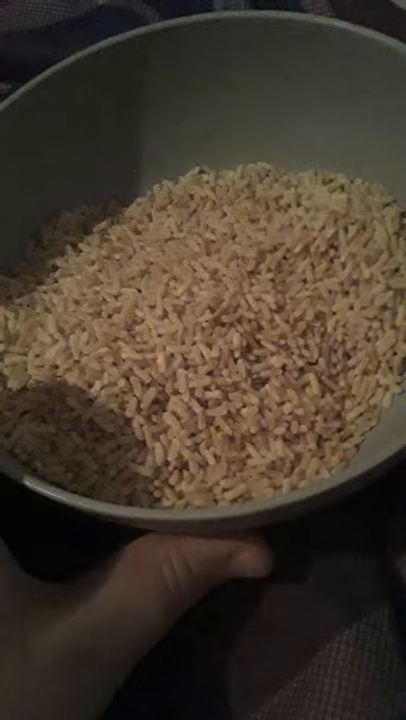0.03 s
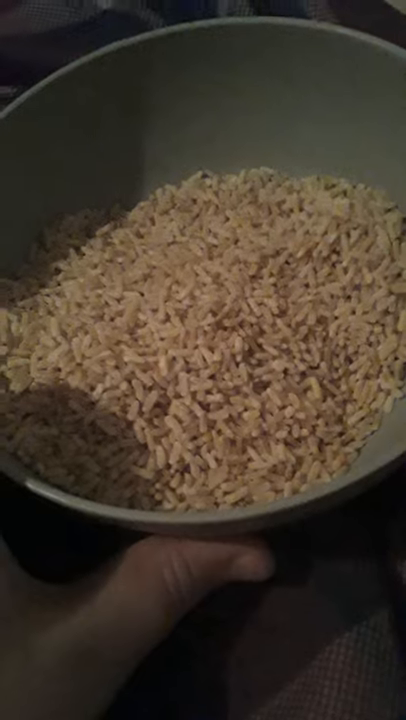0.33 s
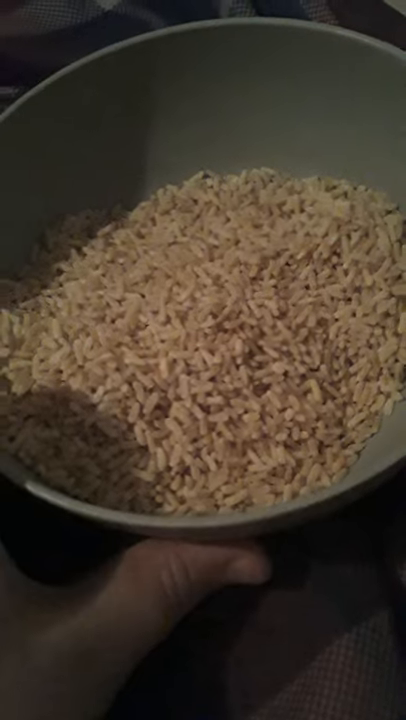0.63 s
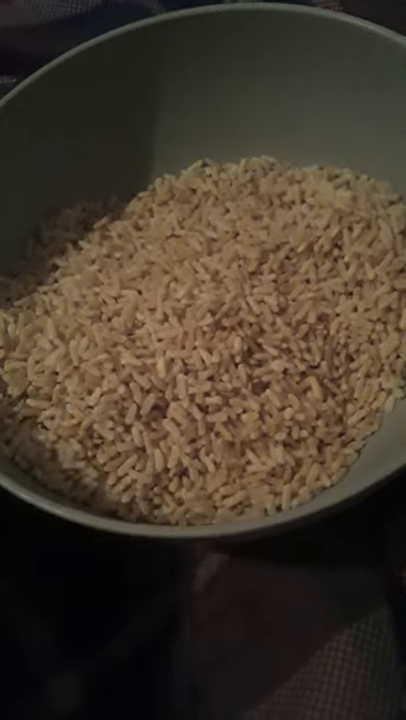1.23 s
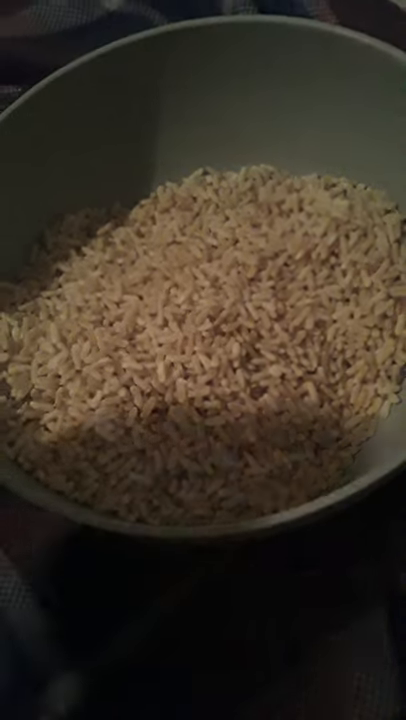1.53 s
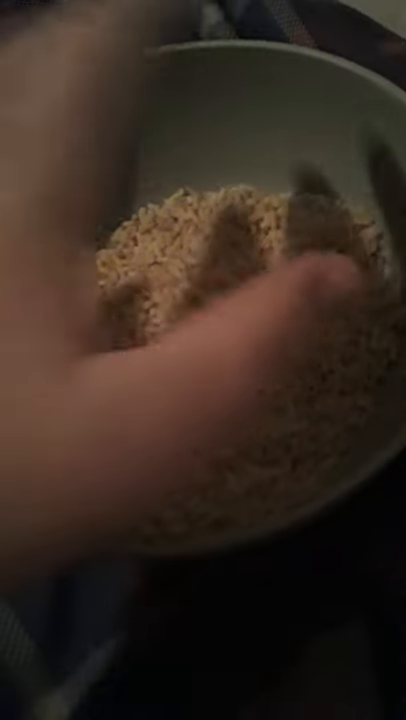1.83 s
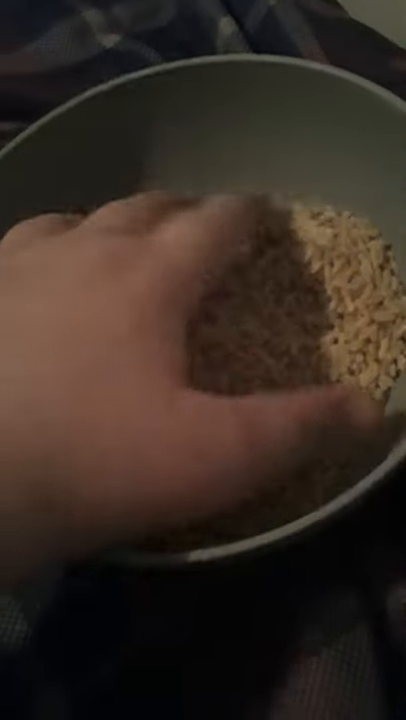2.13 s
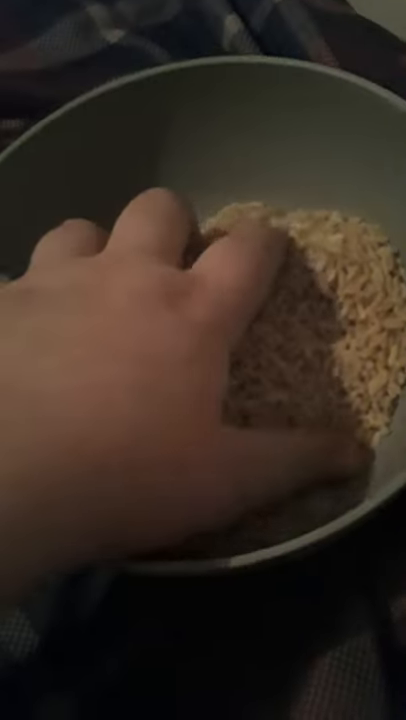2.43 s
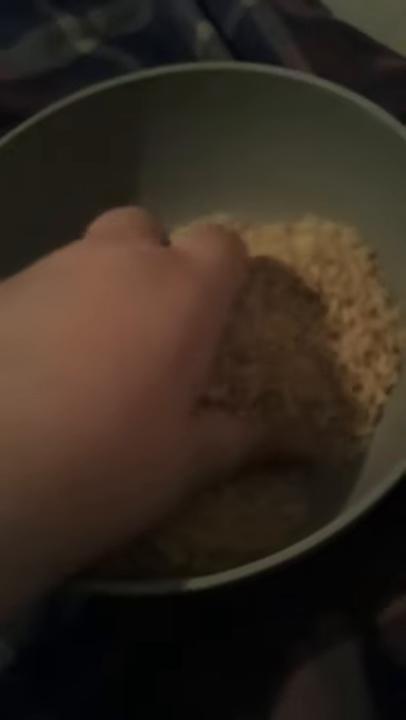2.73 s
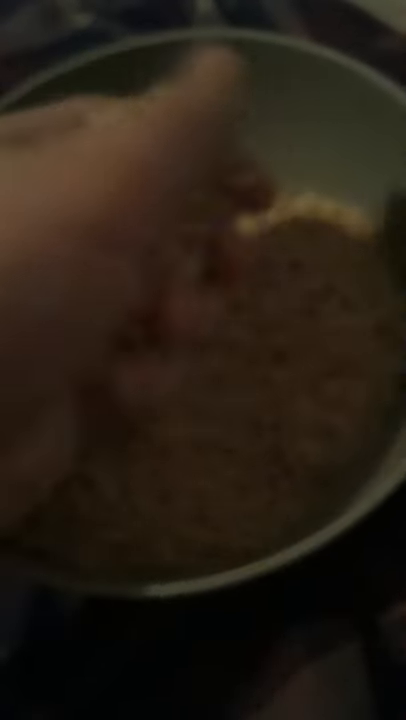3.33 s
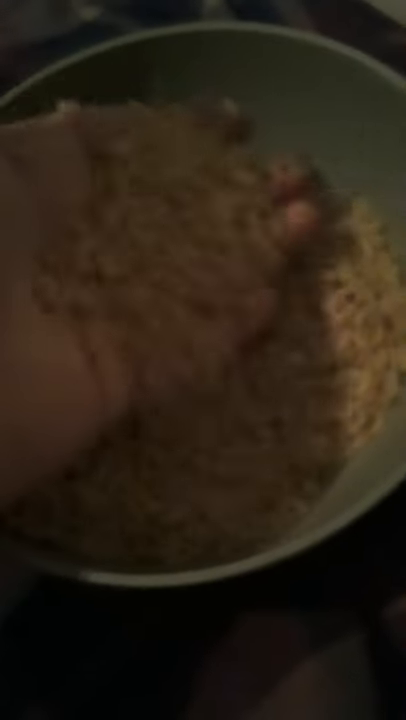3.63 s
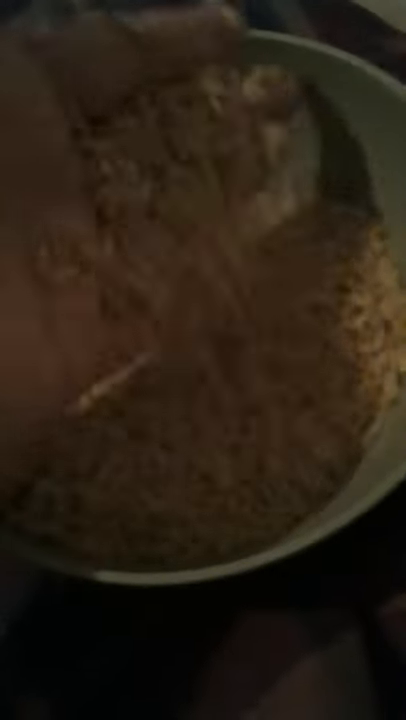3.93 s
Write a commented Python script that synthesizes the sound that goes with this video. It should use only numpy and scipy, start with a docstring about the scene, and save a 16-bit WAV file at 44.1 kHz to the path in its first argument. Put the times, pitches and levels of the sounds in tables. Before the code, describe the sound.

Close to the microphone in a quiet room, dry rice shifts faintly in a bowl. A hand then digs in with a crisp, crackling rustle and lifts, letting a thin stream of grains patter back down.

```python
"""Dry rice in a bowl: a hand plunges in, closes on a fistful, lifts it and lets grains trickle back.
Countless tiny contacts crackle at the surface and, deeper down, ring the bowl; falling grains tick
on the heap. Before the plunge, fingers scuff the bowl, the heap creeps and the bowl settles.
A phone close above hears most of it left port first, in a quiet room with rumble, hiss and faint hum."""
import sys
import numpy as np
from scipy import signal
from scipy.fft import rfft, irfft, next_fast_len
from scipy.io import wavfile

SR = 44100
rng = np.random.default_rng(int(sys.argv[2]) if len(sys.argv) > 2 else 0)


def generate_wav(sig):
    """Save sig (samples, or channels by samples) to the path in sys.argv[1] as 16-bit PCM at SR."""
    pcm = np.round(np.clip(np.atleast_2d(sig).T, -1, 1) * 32767).astype(np.int16)
    wavfile.write(sys.argv[1], SR, pcm)


N = 176400

# fingers scuffing the bowl (time [s], level [dB])
FINGER_SCUFFS = [(0.263, -60), (0.68, -57), (3.603, -54)]
# grains sliding with a faint whistle (start [s], length [s], level [dB], pitch [Hz])
HEAP_SLIDES = [(0.654, 0.34, -73, 3600), (.7, 0.33, -80.5, 4500), (1.148, 0.18, -77, 4200),
               (1.5, .4, -76, 4240), (1.68, 0.39, -70, 3640)]
# single grains landing or slipping (time [s], level [dB], brightness [dB], pitch [Hz])
GRAIN_TICKS = [(0.8224, -45, -15, 3580), (2.1411, -29, -19, 3640), (2.1439, -25, -19, 3600),
               (2.2438, -39, -14, 3700), (2.843, -38, 7, 4000), (2.868, -32.5, 5, 4000),
               (2.902, -36.5, 8.5, 4000), (3.4500, -39.5, 0, 3540), (3.4775, -46, -5.5, 4400),
               (3.5170, -54, -2, 4900), (3.5513, -32.5, -8, 3530), (3.6036, -42, 0, 3340),
               (3.6498, -27, -11, 3930), (3.6529, -21.5, 0.5, 3870), (3.6546, -25, -4, 3530),
               (3.6569, -21.5, 2, 3600), (3.666, -35, -2, 4200), (3.6815, -35, 5, 3640),
               (3.6834, -32, 3, 3500), (3.6907, -39, 0, 4300), (3.7034, -24, 1, 4060),
               (3.7045, -21.5, 0.5, 3900), (3.7097, -20, 0, 4000), (3.7277, -35, -6, 3700),
               (3.7322, -36, -4, 3200), (3.7472, -35, 5, 4220), (3.7951, -35.5, -2, 3550),
               (3.8185, -34.5, -4, 3750), (3.8308, -40, 2, 3600), (3.8339, -30.5, 7, 3420),
               (3.8581, -20, 0, 3670), (3.8944, -35, -4, 3620), (3.9140, -43, 0, 3620),
               (3.9566, -33.5, 8, 3830), (3.9651, -36, 0, 3500), (3.9900, -34.5, -2, 3880),
               (3.9914, -33, 7, 4330)]
# hand digging (time [s], crisp rustle [dB], deep crunch [dB], top fizz [dB])
DIG_LEVELS = [(1.99, -84, -82, -84), (2.025, -76, -72, -88), (2.05, -63, -70, -75), (2.112, -60, -64, -67),
              (2.14, -50, -69, -61), (2.157, -38, -64, -57), (2.172, -35, -55.5, -48),
              (2.188, -49, -61, -67), (2.21, -61, -75, -80), (2.238, -64, -69, -80), (2.262, -45, -58, -65),
              (2.29, -39.5, -50, -54), (2.33, -42.5, -50, -59), (2.376, -46.5, -53, -62),
              (2.416, -39, -45, -56.5), (2.474, -51, -52, -64), (2.524, -42, -43, -60.5),
              (2.555, -47, -44, -59), (2.59, -49, -49, -66), (2.72, -47.5, -46, -57.5),
              (2.81, -47, -46, -61.5), (2.85, -50, -45.5, -58), (2.955, -48, -48.5, -59),
              (3.02, -55.5, -54, -63), (3.27, -64.5, -59.5, -69), (3.37, -67.5, -65.5, -72.5),
              (3.44, -74, -68.5, -73)]
# grains leaving the lifted hand (time [s], level [dB])
TRICKLE_LEVELS = [(3.38, -73), (3.47, -59), (3.58, -58.5), (3.67, -53.5), (3.76, -54.5), (3.9, -56.5),
                  (4.0, -53.5)]
# room noise spectra (frequency [Hz], level [dB])
RUMBLE_SPECTRUM = [(20, -43), (28, -53), (40, -31), (55, -7), (68, -12.5), (95, -7), (130, 1.5), (170, -4),
                   (220, -4.5), (300, -12.5), (400, -21.5), (600, -27), (1200, -32), (4000, -74)]
HISS_SPECTRUM = [(100, -11), (300, 1), (600, 0.5), (850, 2), (1200, 0), (1800, -3), (2500, -9.5),
                 (4200, -11), (6000, -16), (8000, -21), (10000, -17.5), (13000, -12.5), (16000, -16)]
# grain contact spectra (frequency [Hz], level [dB])
CRISP_SPECTRUM = [(300, -27), (1000, -27.5), (2000, -17.5), (2600, -6.5), (3000, -0.5), (3600, -3),
                  (4500, -3.5), (5600, -9.5), (6500, -14.5), (7800, -31.5), (10000, -27), (16000, -43)]
CRUNCH_SPECTRUM = [(150, -22), (350, -12.5), (520, -12.5), (680, -5.5), (850, 1), (1050, -1), (1400, -6),
                   (1650, -5), (2050, -1.5), (2500, -5), (3200, -25.5), (5000, -17.5), (8000, -36)]
FIZZ_SPECTRUM = [(2000, -56), (6000, -11.5), (8000, -11.5), (9500, 0.5), (12000, 1), (16000, 0)]
TICK_SPECTRUM = [(200, -25), (600, -23), (1000, -5.5), (1500, -20.5), (2400, -4.5), (3100, -2.5),
                 (4500, -1), (5400, -5.5), (6400, -0.5), (7900, -29.5), (10000, -35), (16000, -30)]
# resonances of the filled bowl (frequency [Hz], width [Hz], level re direct sound [dB])
BOWL_MODES = [(823, 57, -8), (906, 27, -10), (1120, 13, -36), (1298, 19, -20), (1580, 51, -7),
              (1860, 15, -14), (1914, 20, -17), (3000, 24, -31), (3360, 18, -22), (3500, 100, -2)]


def undb(db):
    """Decibels to gain."""
    return 10 ** (np.asarray(db) / 20)


def times():
    """Sample times [s]."""
    return np.arange(N) / SR


def envelope(rows, column=1):
    """Gain along one dB column of a table; silent outside it."""
    rows = np.array(rows)
    return undb(np.interp(times(), rows[:, 0], rows[:, column], left=-140, right=-140))


def colour(x, spectrum, modes=()):
    """Causal unit-energy filter from a spectrum and optional resonances."""
    size = next_fast_len(x.shape[-1] + 8192)
    f = np.arange(2049) * SR / 4096 + 1e-3
    hz, db = np.array(spectrum).T
    cepstrum = irfft(np.log(undb(np.interp(np.log(f), np.log(hz), db))))
    cepstrum[1:len(f) - 1] *= 2  # fold to minimum phase
    cepstrum[len(f):] = 0
    ring = 1 + sum(undb(mode_db) / (1 + 1j * (f * f - mode_hz ** 2) / (f * width_hz))
                   for mode_hz, width_hz, mode_db in modes)
    response = irfft(np.exp(rfft(cepstrum)) * ring)
    response /= np.linalg.norm(response)
    return irfft(rfft(x, size) * rfft(response, size), size)[..., :x.shape[-1]]


def drift(rate_hz):
    """Smooth random drift, spread near 1."""
    steps = np.random.default_rng(rng.integers(1 << 30)).standard_normal(4096)
    return 1.2 * np.interp(times() * rate_hz, np.arange(len(steps)), steps)


def contacts(per_s, spread_db, surge_db, surge_hz):
    """Random grain contacts of uneven size, bunched into slips; rms 1."""
    hits = (rng.random(N) < per_s / SR) * rng.choice([-1, 1], N)
    hits = hits * undb(spread_db * np.minimum(rng.exponential(size=N), 5))
    hits *= undb(surge_db * drift(surge_hz))
    return hits / np.std(hits)


def pan(left_db):
    """Stereo gains, left over right by left_db."""
    return undb(np.array([[left_db], [-left_db]]) / 2)


def ports(x, left_db, tail_db, t60_s, lag_s=0.00025):
    """Each impulse reaches the left port, then the right; the bowl wall adds a short tail."""
    n = len(x)
    lags_s = np.abs(lag_s + 0.000025 * rng.standard_normal(n))
    arrival = np.arange(n) + np.rint(lags_s * SR).astype(int)
    direct = np.array([x, np.bincount(arrival, x, n)[:n]])
    pole = np.exp(-2 * np.log(1000) / (t60_s * SR))
    tail_power = signal.lfilter([0, 1 - pole], [1, -pole], direct ** 2 + 1e-24)
    tail = np.sqrt(tail_power) * rng.standard_normal((2, n))
    return (direct + undb(tail_db) * tail) * pan(left_db) / np.hypot(1, undb(tail_db))


def room(hum_hz=117.9, swell_s=0.75):
    """Near-mono rumble; hiss and a wavering hum swell in at the start."""
    rumble = colour(rng.standard_normal(N), RUMBLE_SPECTRUM)
    rumble = rumble + undb(-15.5) * colour(rng.standard_normal((2, N)), RUMBLE_SPECTRUM)
    hiss = colour(rng.standard_normal((2, N)), HISS_SPECTRUM) * undb(0.6 * drift(6.77))
    hum = np.sqrt(2) * np.sin(2 * np.pi * hum_hz * times() + 0.54 * drift(5)) * undb(0.82 * drift(4))
    swell = undb(-6 * np.maximum(0, 1 - times() / swell_s))
    return undb(-56.5) * rumble + swell * (undb(-62.5) * hiss + undb(-65) * hum)


def scuffs(decay_s=0.014):
    """Short, dull rubs of skin on the bowl."""
    t = times()
    push = sum(undb(db) * (t > at_s) * np.exp(-np.abs(t - at_s) / decay_s) for at_s, db in FINGER_SCUFFS)
    rub = ports(rng.standard_normal(N) * push, left_db=-4, tail_db=12, t60_s=0.011)
    return colour(rub, CRUNCH_SPECTRUM, BOWL_MODES) + undb(-9) * colour(rub, CRISP_SPECTRUM)


def slides(width_hz=350, ring_db=7):
    """The heap creeps as the bowl tips; each slide has its own pitch."""
    out = np.zeros((2, N))
    creep = contacts(per_s=3300, spread_db=2, surge_db=2, surge_hz=44)
    creep = ports(creep, left_db=-7.5, tail_db=6, t60_s=0.014)
    for start_s, length_s, db, hz in HEAP_SLIDES:
        span = slice(int(start_s * SR), int((start_s + length_s) * SR))
        slide = creep[:, span] * undb(db) * signal.windows.tukey(span.stop - span.start)
        whistle = colour(slide, CRISP_SPECTRUM, [(hz, width_hz, ring_db)])
        out[:, span] += whistle + undb(-5.5) * colour(slide, FIZZ_SPECTRUM)
    return out


def ticks(gain_db=10, width_hz=900, ring_db=3):
    """One impulse per grain, ringing about 1 ms at its own pitch; its fizz leans left."""
    size = 2048
    out = np.zeros((2, N + size))
    for at_s, db, bright_db, hz in GRAIN_TICKS:
        impulse = signal.unit_impulse(size) * undb(db + gain_db)
        hit = ports(impulse, left_db=-0.7, tail_db=-5.5, t60_s=0.011)
        ring = colour(hit, TICK_SPECTRUM, [(hz, width_hz, ring_db)])
        fizz = pan(1.5) * undb(bright_db - 4.5) * colour(hit, FIZZ_SPECTRUM)
        start = int(at_s * SR)
        out[:, start:start + size] += ring + fizz
    return out[:, :N]


def thud(at_s=1.095, hz=50.3, half_width_s=0.039):
    """A few low cycles: the bowl settles as the supporting hand lets go."""
    t = times() - at_s
    return undb(-58) * np.sin(2 * np.pi * hz * t) * np.exp(-(t / half_width_s) ** 2)


def digging():
    """Surface grains rustle and fizz; squeezed grains below crunch against the bowl."""
    crisp = contacts(per_s=13000, spread_db=2, surge_db=0.8, surge_hz=220) * envelope(DIG_LEVELS, 1)
    crunch = contacts(per_s=9000, spread_db=2, surge_db=1.5, surge_hz=150) * envelope(DIG_LEVELS, 2)
    fizz = contacts(per_s=13000, spread_db=3.5, surge_db=1, surge_hz=110) * envelope(DIG_LEVELS, 3)
    crisp = ports(crisp, left_db=1, tail_db=-2.5, t60_s=0.012)
    crunch = ports(crunch, left_db=4, tail_db=-9, t60_s=0.019, lag_s=0.00015)
    fizz = ports(fizz, left_db=2.5, tail_db=0, t60_s=0.007)
    return (undb(2) * colour(crisp, CRISP_SPECTRUM, BOWL_MODES)
            + undb(3.5) * colour(crunch, CRUNCH_SPECTRUM, BOWL_MODES)
            + undb(5.5) * colour(fizz, FIZZ_SPECTRUM))


def brush(peak_s=2.158, rise_s=0.029, fall_s=0.012, ring_hz=3670, width_hz=290, ring_db=19):
    """Fingertips skim the surface before plunging: a quick swish at the grains' ring."""
    t = times() - peak_s
    speed = np.exp(np.minimum(t / rise_s, -t / fall_s))
    grains = contacts(per_s=11000, spread_db=2.5, surge_db=4, surge_hz=150) * speed
    swish = ports(grains, left_db=-6, tail_db=-8.5, t60_s=0.011)
    return undb(-37) * colour(swish, CRISP_SPECTRUM, [(ring_hz, width_hz, ring_db)])


def trickle():
    """A thin stream slides off the hand and patters on the heap."""
    grains = contacts(per_s=2400, spread_db=2.5, surge_db=1.56, surge_hz=90) * envelope(TRICKLE_LEVELS)
    patter = ports(grains, left_db=1.5, tail_db=3.5, t60_s=0.018)
    body = colour(patter, CRISP_SPECTRUM, BOWL_MODES) + colour(patter, CRUNCH_SPECTRUM, BOWL_MODES)
    return undb(-1) * body + colour(patter, FIZZ_SPECTRUM)


def scene():
    """Rice, bowl and room."""
    return brush() + digging() + trickle() + slides() + scuffs() + ticks() + thud() + room()


def record(dry, start_s=0.062, fade_s=0.016, cutoff_hz=15900):
    """Brief silence, fast fade-in, steep low-pass."""
    fade_in = np.clip((times() - start_s) / fade_s, 0, 1)
    lowpass = signal.ellip(12, 0.2, 70, cutoff_hz, fs=SR, output="sos")
    return signal.sosfilt(lowpass, dry * fade_in)


dry = scene()
out = record(dry)
generate_wav(out)
```